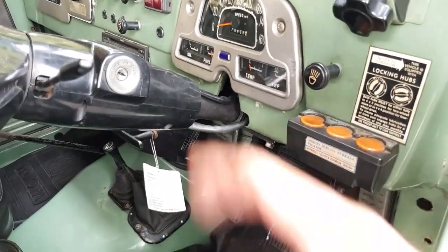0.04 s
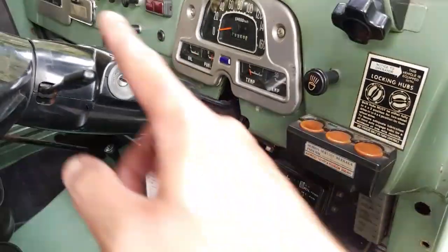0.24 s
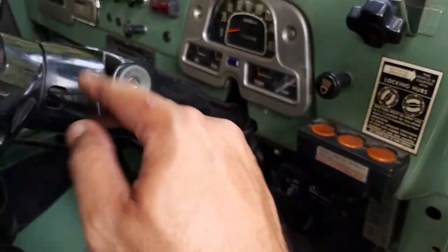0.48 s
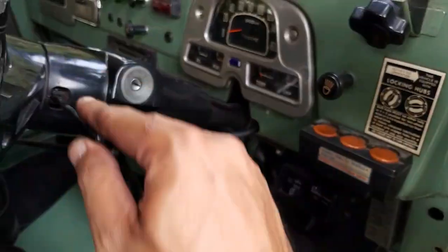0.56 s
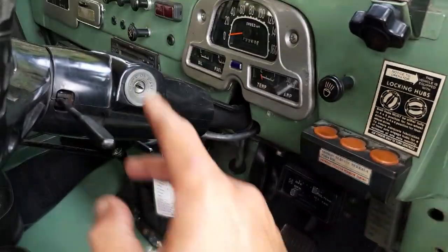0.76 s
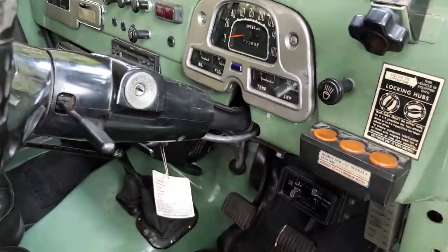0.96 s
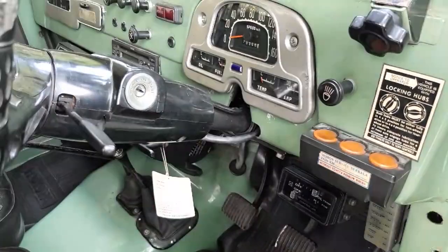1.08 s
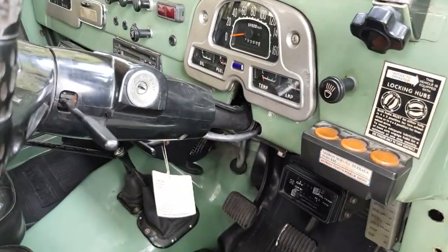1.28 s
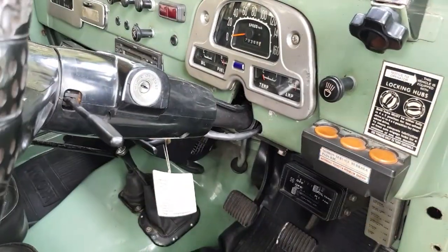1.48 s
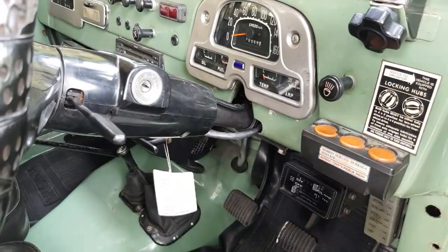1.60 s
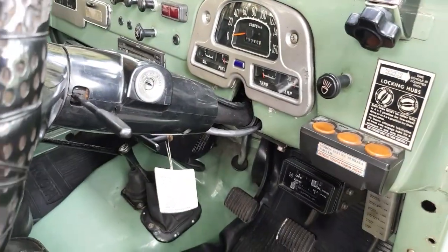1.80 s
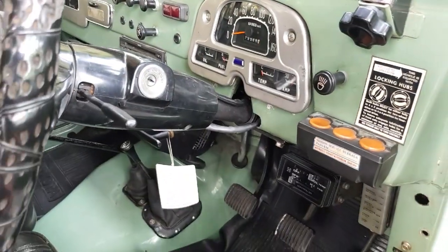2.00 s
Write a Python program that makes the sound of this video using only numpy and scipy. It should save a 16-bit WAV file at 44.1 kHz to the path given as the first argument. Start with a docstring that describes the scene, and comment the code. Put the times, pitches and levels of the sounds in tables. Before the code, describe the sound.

Close stereo microphones catch light plastic ticks, a hard turn signal lever snap ringing the steering column, thin squeaks and rasps, then a single bright flasher click, with a quiet low engine rumble throughout.

```python
"""Inside a cab with the engine idling low, a hand touches the turn signal stalk and snaps it over its detent.
Bursts of noise and fading tones make the stalk's contacts, the ringing steering column and the relay's clicks.
Fluttering noise makes the rubbing hand and the faint sizzle of the switch, which also rings a springy part.
Thin squeaks, made of gliding tones, rise and give way to noisy rasps. A thud and a boom follow the snap.
Steady wavering tones over soft noise make the engine."""
import sys
import numpy as np
from scipy import signal
from scipy.fft import rfft, irfft, next_fast_len
from scipy.io import wavfile
from scipy.ndimage import map_coordinates

SR = 44100
rng = np.random.default_rng(int(sys.argv[2]) if len(sys.argv) > 2 else 0)


def transcribe(u):
    """Save the signal u as a 16-bit wav file named by the first command-line argument.

    u: samples, shape (n,) or (channels, n), limited to [-1, 1]; the rate is SR.
    q: integer samples, one column per channel.
    """
    v = np.clip(np.atleast_2d(u).T, -1, 1)
    q = np.round(v * 32767).astype(np.int16)
    wavfile.write(sys.argv[1], SR, q)


N = 90404

# The stalk snaps home, then rattles more weakly. Each row: start in seconds, level in dB, hold in seconds.
SNAPS = [(0.5881, -21, 0.0059), (0.604, -34.5, 0.003), (0.622, -42, 0.0021)]
SNAP_ATTACK_S = .00033


def amp(db):
    """Turn decibels into a gain."""
    return 10 ** (np.asarray(db) / 20)


def unit(x):
    """Scale a signal to an average strength (rms) of 1."""
    return x / np.sqrt(np.mean(x ** 2) + 1e-20)


def clock():
    """Give the time of each sample in seconds."""
    return np.arange(N) / SR


def along(points, hz):
    """Read a curve of (Hz, value) points, with pitch on a logarithmic axis."""
    point_hz, values = np.transpose(points)
    return np.interp(np.log(hz + 1), np.log(point_hz + 1), values)


def level(rows):
    """Turn (seconds, dB) points into a gain for each sample."""
    return amp(np.interp(clock(), *np.transpose(rows)))


def wobble(rate):
    """Draw a smooth random curve through `rate` random points a second."""
    points = rng.standard_normal(int(N * rate / SR) + 4)
    return map_coordinates(points, [clock() * rate])


def filtered(x, response):
    """Change the strength and timing of each frequency in x."""
    padded = next_fast_len(N + SR // 2)
    spectrum = rfft(x, padded)
    return irfft(spectrum * response(np.fft.rfftfreq(padded, 1 / SR)), padded)[..., :N]


def noise(colour, tilt=0):
    """Noise of rms 1 with a colour and a tilt in dB per octave; it fades below the colour's first point."""
    low = colour[0][0]

    def response(f):
        octaves = np.log2(np.maximum(f, low) / low)
        return amp(along(colour, f) + tilt * octaves) * np.minimum(f / low, 1) ** 2

    return unit(filtered(rng.standard_normal(N), response))


def envelope(s, hold, t60, attack):
    """Rise quickly, hold, then die away by 60 dB in t60 seconds."""
    t = np.maximum(clock() - s, 0)
    release = amp(-60 * np.maximum(t - hold, 0) / t60)
    return (1 - np.exp(-t / attack)) * release


def swell(s, rise, fall):
    """A smooth hump that peaks at s."""
    t = clock() - s
    return np.exp(-(t / np.where(t < 0, rise, fall)) ** 2)


def ring(modes, s, blur=0.55, attack=0.00064):
    """A struck object sounds as fading tones, here with slightly unsteady phase."""
    out = np.zeros(N)
    for hz, db, t60 in modes:
        phase = 2 * np.pi * (hz * clock() + rng.random()) + blur * wobble(150)
        out += amp(db) * envelope(s, 0, t60, attack) * np.sin(phase)
    size = np.linalg.norm([amp(db) for _, db, _ in modes]) / np.sqrt(2)
    return out / size


def struck(modes, drive):
    """A chattering force keeps tones ringing; the result has the same rms as the force."""
    out = signal.fftconvolve(drive, ring(modes, 0, blur=0.16))[:N]
    return unit(out) * np.sqrt(np.mean(drive ** 2))


def panned(db):
    """Left and right gains of equal total power for a level difference in dB."""
    gains = np.array([amp(db / 2), amp(-db / 2)]).reshape(2, -1)
    return gains / np.sqrt(np.mean(gains ** 2, axis=0))


def place(x, lag_ms, pan, cab_db):
    """Direct sound reaches two microphones (left later by lag_ms), followed by the cab's short tail."""
    # How the tail fades. Each row: frequency in Hz, time to fall by 60 dB in seconds.
    cab = [(200, 0.33), (1500, 0.28), (6000, 0.16), (12000, 0.19)]
    sides = np.array([[1], [-1]])
    direct = filtered(x, lambda f: np.exp(-1j * np.pi * f * sides * lag_ms / 10 ** 3))
    # The tail is noise that fades at a different speed for each frequency.
    hz, t, z = signal.stft(rng.standard_normal((2, SR // 3)), SR, nperseg=256)
    fading = z * amp(-60 * t / along(cab, hz)[:, None])
    tail = signal.istft(fading, SR, nperseg=256)[1]
    wet = signal.fftconvolve(x[None], tail / np.linalg.norm(tail[0]), axes=1)[:, :N]
    return filtered(direct + amp(cab_db) * wet, lambda f: panned(along(pan, f)))


def detent(grain_db=3):
    """The stalk snaps home with a rattling crack; the dash panel swells after it."""
    # Colour of the crack. Each row: frequency in Hz, level in dB.
    crack_colour = [(280, -35), (470, -23), (640, -9.5), (830, -12.5), (1100, -38), (1500, -10),
                    (2100, -21), (2450, -8.5), (3700, -8.5), (4800, -1), (5700, -9), (6400, -4),
                    (7700, -10.5), (9000, -3), (13000, -16)]
    # Tones of the dash panel. Each row: frequency in Hz, relative level in dB, time to fall by 60 dB in seconds.
    panel = [(120, 8, 0.092), (174.8, 3.5, 0.097), (257.5, 5.5, 0.13), (347.5, -14.5, 0.2), (477, 5, 0.15)]
    panel_db, panel_attack_s, panel_delay_s = -25.5, .025, .0147
    force = sum(amp(db) * envelope(s, hold, .026, SNAP_ATTACK_S) for s, db, hold in SNAPS)
    crack = force * unit(noise(crack_colour) * amp(grain_db * wobble(700)))
    return crack + amp(panel_db) * ring(panel, SNAPS[0][0] + panel_delay_s, attack=panel_attack_s)


def column():
    """The snap rings the steel column; each tone reaches the two microphones in its own way."""
    # Tones of the column. Each row: frequency in Hz, relative level in dB, time to fall by 60 dB in seconds,
    # left minus right in dB, polarity (-1 = the microphones hear opposite swings).
    column_modes = [(419, -4, .17, 1, -1), (470, -7, .2, 0, 1), (560, -9, .14, 5, 1), (642, 1, .13, -1, 1),
                    (1038, -21, .17, 0, 1), (1169, -13, .14, 1, -1), (1307, -15, .15, 0, 1),
                    (1516, -5, .125, -1, 1), (1596, -12, .15, -1, 1), (1733, -12, .15, 0, 1),
                    (1813, -11, .14, 0, -1), (2440, -11, .08, 0, 1), (2615, -15, .11, 0, 1),
                    (2911, -10, .13, 0, 1), (3072, -8, .12, 0, -1), (3197, -8, .12, -15, 1),
                    (3546, -9, .11, 0, 1), (3918, -6, .12, -4, -1), (4673, -7, .12, 3, -1),
                    (4823, -5, .14, -4, 1), (6274, -2, .12, 18, 1), (6424, -7, .11, 2, 1),
                    (7261, -7, .11, -5, -1), (8303, -6, .11, -1, 1), (8624, -4, .13, 14, 1),
                    (8990, -7, .11, -15, -1), (9137, -6, .1, -7, 1)]
    column_db, attack_s = -18, .0035
    out = np.zeros((2, N))
    for hz, db, t60, pan_db, polarity in column_modes:
        mode = ring([(hz, 0, t60)], SNAPS[0][0], blur=.2, attack=attack_s)
        out += amp(db) * mode * panned(pan_db) * [[1], [polarity]]
    size = np.linalg.norm([amp(row[1]) for row in column_modes])
    return amp(column_db) * out / size


def dash_knock():
    """A duller knock sounds from the dash just after the snap."""
    # Colour of the knock. Each row: frequency in Hz, level in dB.
    knock_colour = [(200, -6.5), (520, 0), (800, -11.5), (1050, -8.5), (1250, -15), (1600, -5.5),
                    (2200, -28), (8000, -57)]
    start_s, knock_db, hold_s, t60_s = .625, -34, .004, .06
    return amp(knock_db) * envelope(start_s, hold_s, t60_s, SNAP_ATTACK_S) * noise(knock_colour)


def flasher(attack_s=0.00014):
    """The relay pulls in with a knock, strikes and bounces, ringing its can."""
    # Relay contacts. Each row: start in seconds, level in dB, hold in seconds, treble tilt in dB per octave.
    contacts = [(1.268, -38.5, .002, -4), (1.2735, -25.5, .0012, 2), (1.2772, -21, .002, -1.4),
                (1.2806, -25.5, .0012, 1), (1.2885, -34, .002, 0)]
    # Colour of the clicks. Each row: frequency in Hz, level in dB.
    click_colour = [(120, -41), (200, -16.5), (768, -13.5), (1230, -12.5), (1440, -12.5), (2110, -19),
                    (2310, -14.5), (3600, -23), (4600, -11), (6240, -9.5), (7970, -11.5), (11000, -6),
                    (12600, 0)]
    # Tones of the can. Each row: frequency in Hz, relative level in dB, time to fall by 60 dB in seconds.
    can_modes = [(1453, -13, .09), (2307, -15, .07), (4398, -12, .09), (5075, -7, .07), (6290, -6, .11),
                 (7154, -8, .06), (7485, -3, .06), (9250, -2, .06), (11430, 1, .07), (12380, 1, .11),
                 (12800, 4, .06)]
    # Tones of the panel that holds the relay, with the same columns in Hz, dB and seconds.
    holder = [(245, 5, 0.079), (327, -3, 0.06), (564, -6, 0.048)]
    click_t60_s, ring_db, knock_db = .007, -11, -39
    can = np.zeros(N)
    for s, db, hold, tilt in contacts:
        click = envelope(s, hold, click_t60_s, attack_s) * noise(click_colour, tilt)
        can += amp(db) * (click + amp(ring_db) * ring(can_modes, s))
    return can + amp(knock_db) * ring(holder, contacts[0][0])


def stalk_ticks(grain_db=5):
    """The loose stalk chatters briefly against its stops."""
    # Light contacts. Each row: start in seconds, level in dB, hold in seconds, treble tilt in dB per octave.
    ticks = [(.1945, -45, .002, -1), (.2255, -29.5, .003, -1), (.231, -25, .002, .6),
             (.236, -31.5, .003, -2), (.243, -41, .004, 0), (.3515, -45, .001, .3), (.4385, -42, .002, .7),
             (.491, -51, .001, 3), (.509, -49, .002, 4), (.5425, -30, .003, -.7), (.549, -32.5, .002, -2.5),
             (.557, -39, .002, -2.5), (.582, -29, .003, -2.5), (.962, -46, .002, 0), (1.214, -42, .002, 2)]
    # Colour of the ticks. Each row: frequency in Hz, level in dB.
    tick_colour = [(240, -46), (400, -17.5), (1160, -21), (1570, -8.5), (3450, -7), (3880, -18.5),
                   (4760, -3), (6650, -22.5), (7150, 3.5), (7810, -11), (13000, -2)]
    # Tones of the stalk. Each row: frequency in Hz, relative level in dB, time to fall by 60 dB in seconds.
    stalk = [(1561, -0.5, 0.039), (1683, -5, 0.042), (2430, -10, 0.04), (3350, -21, .04),
             (4940, -1.5, 0.029), (7243, 0.5, 0.039), (8690, 5, 0.029), (9050, -2.5, 0.025),
             (9400, 1.5, .04), (10600, 0.5, 0.037), (11250, 3, 0.032), (11450, 2, .05), (12660, 3.5, 0.043)]
    t60_s, attack_s, ring_db = .014, .0003, -2.5
    scatter_db = 3.5  # each contact favours other tones
    out = np.zeros(N)
    for s, db, hold, tilt in ticks:
        chatter = envelope(s, hold, t60_s, attack_s) * unit(amp(grain_db * wobble(900)))
        modes = [(hz, mode_db + scatter_db * rng.standard_normal(), t60) for hz, mode_db, t60 in stalk]
        ringing = struck(modes, chatter * rng.standard_normal(N))
        out += amp(db) * (chatter * noise(tick_colour, tilt) + amp(ring_db) * ringing)
    return out


def touches():
    """Fingertips land on the stalk with dull, soft knocks."""
    # Landings. Each row: peak time in seconds, level in dB, rise in seconds, fall in seconds.
    landings = [(0.421, -47.5, 0.022, 0.011), (0.449, -53, 0.0022, 0.0089), (0.494, -55.5, 0.009, 0.022)]
    # Colour of the knocks. Each row: frequency in Hz, level in dB.
    touch_colour = [(300, -17), (620, -3), (1150, -17.5), (1700, -17), (2100, -18.5), (5000, -24.5),
                    (13000, -20.5)]
    return sum(amp(db) * swell(s, rise, fall) for s, db, rise, fall in landings) * noise(touch_colour)


def rubs(grain_db=3):
    """The hand brushes the controls with a grainy hiss."""
    # Soft strokes. Each row: peak time in seconds, level in dB, rise in seconds, fall in seconds,
    # tilt in dB per octave.
    strokes = [(0.214, -55.5, 0.05, 0.011, -7), (.5, -54, 0.035, 0.032, -3.5),
               (1.195, -48.5, 0.028, 0.075, -3.5), (1.229, -38, 0.021, 0.0076, 1),
               (1.785, -64.5, 0.062, 0.033, -5.5)]
    # Colour of the rubbing. Each row: frequency in Hz, level in dB.
    rub_colour = [(240, -20), (400, -15.5), (1820, -29), (2070, -4), (2330, -7), (4110, -10), (5040, -7),
                  (13000, 5)]
    out = np.zeros(N)
    for s, db, rise, fall, tilt in strokes:
        grains = unit(noise(rub_colour, tilt) * amp(grain_db * wobble(500)))
        out += amp(db) * swell(s, rise, fall) * grains
    return out


def sizzle(hiss_db=-1):
    """Tiny slips in the switch keep a springy part ringing."""
    # Strength of the sizzle over time. Each row: time in seconds, level in dB.
    sizzle_level = [(.94, -78), (.968, -47), (1.0, -44), (1.019, -35.5), (1.03, -51), (1.05, -60),
                    (1.063, -39), (1.09, -67), (1.109, -44), (1.125, -62), (1.15, -70), (1.25, -58),
                    (1.4, -100)]
    # Tones of the springy part. Each row: frequency in Hz, relative level in dB, time to fall by 60 dB in seconds.
    spring = [(2647, -11, 0.046), (5000, -27, 0.092), (7330, -4, 0.04), (8580, -10, 0.055),
              (9280, -5, 0.024), (11110, -1.5, 0.031), (12380, -1.5, 0.08), (12900, 6.5, 0.032)]
    # Colour of the hiss. Each row: frequency in Hz, level in dB.
    hiss_colour = [(1000, -16.5), (2700, -15), (3400, -36), (4500, 1.5), (6200, -16), (7200, -4),
                   (8000, -44), (9400, 1.5), (10400, -15), (12400, -12), (13000, 3.5)]
    scatter_db, slips_per_s = 6.5, 350
    slips = unit(amp(scatter_db * wobble(slips_per_s)))
    ringing = struck(spring, slips * rng.standard_normal(N))
    hiss = slips * noise(hiss_colour)
    return level(sizzle_level) * (ringing + amp(hiss_db) * hiss)


def squeaks(flutter_db=4):
    """Thin rising tones with an unsteady pitch and a fluttering level."""
    # Each row: start in seconds, length in seconds, first pitch in Hz, last pitch in Hz, level in dB,
    # octave level in dB relative to the main tone.
    squeak_rows = [(0.689, 0.088, 2816, 3423, -47.5, 7.5), (1.894, 0.088, 2624, 2765, -62, 6),
                   (1.981, 0.065, 2633, 3264, -57, -7.5)]
    jitter = .025  # random pitch change, as a share of the pitch
    halfway_db = -5  # the tone between pitch and octave
    out = np.zeros(N)
    for s, length, first_hz, last_hz, db, octave_db in squeak_rows:
        progress = np.clip((clock() - s) / length, 0, 1)
        pitch = (first_hz + (last_hz - first_hz) * progress) * (1 + jitter * wobble(1200))
        phase = 2 * np.pi * np.cumsum(pitch) / SR
        partials = np.sin(phase) + amp(halfway_db) * np.sin(1.5 * phase)
        partials += amp(octave_db) * np.sin(2 * phase)
        arch = np.sqrt(4 * progress * (1 - progress))
        out += amp(db) * arch * unit(partials * amp(flutter_db * wobble(160)))
    return out


def rasps(grain_db=4):
    """Rough chirrs: noise with a fast flutter."""
    # Each row: peak time in seconds, level in dB, rise in seconds, fall in seconds.
    rasp_rows = [(0.825, -48.5, 0.05, 0.033), (0.997, -46, 0.034, 0.023), (2.045, -60.5, 0.034, .04)]
    # Colour of the rasps. Each row: frequency in Hz, level in dB.
    rasp_colour = [(1500, -23.5), (2800, -11), (3600, -36), (4500, 1.5), (5500, -1), (6500, -11.5),
                   (8500, -20.5), (13000, -16.5)]
    swells = sum(amp(db) * swell(s, rise, fall) for s, db, rise, fall in rasp_rows)
    return swells * unit(noise(rasp_colour) * amp(grain_db * wobble(450)))


def shudder(drift=0.28):
    """A dull thud of noise and a low, slightly drifting boom follow the snap."""
    # Strength of the thud over time. Each row: time in seconds, level in dB.
    thud_level = [(.59, -88), (.628, -37.5), (.67, -41), (.72, -43.5), (.8, -53.5), (.9, -77), (1, -73)]
    # Colour of the thud. Each row: frequency in Hz, level in dB.
    thud_colour = [(42, -12), (60, -11), (84, 11.5), (125, -1.5), (250, -19), (480, -14), (900, -28),
                   (2000, -70)]
    # Strength of the boom over time. Each row: time in seconds, level in dB.
    boom_level = [(.6, -66), (.65, -34), (.72, -40.5), (.78, -48.5), (.85, -35.5), (.91, -44.5), (1, -70)]
    boom_hz = 42.5
    boom = np.sqrt(2) * np.sin(2 * np.pi * boom_hz * clock() + drift * wobble(11.9))
    return level(thud_level) * noise(thud_colour) + level(boom_level) * boom


def engine(waver_db=3.5, drift=1.0):
    """Wavering idle tones over a rumble that thins into hiss."""
    # Engine tones. Each row: frequency in Hz, level in dB.
    idle = [(60, -54), (80, -65.5), (99.5, -56.5), (120.5, -60), (181, -60), (225, -66.5), (251, -69)]
    # Colour of the rumble and hiss. Each row: frequency in Hz, level in dB.
    floor_colour = [(30, -14), (42, 2), (69, -1), (150, -9), (237, -13.5), (309, -17.5), (487, -25),
                    (653, -24.5), (1660, -37.5), (3300, -46), (7000, -40), (10200, -53), (12000, -41.5),
                    (13000, -51)]
    # How alike left and right are. Each row: frequency in Hz, likeness (1 = the same, 0 = unrelated).
    floor_alike = [(50, 0.99), (200, 0.78), (500, 0.28), (2000, 0.043), (9000, 0.046)]
    floor_db = -47
    lines = np.zeros(N)
    for hz, db in idle:
        phase = 2 * np.pi * (hz * clock() + rng.random()) + drift * wobble(7.0)
        lines += np.sqrt(2) * amp(db + waver_db * wobble(8.54)) * np.sin(phase)

    def shares(f):
        # Shares of the common sound and of the sound that differs between the sides.
        turn = np.arccos(np.clip(along(floor_alike, f), -1, 1)) / 2
        return np.array([np.cos(turn), np.sin(turn)])

    mid, side = filtered(np.array([noise(floor_colour), noise(floor_colour)]), shares)
    return lines + amp(floor_db) * np.array([mid + side, mid - side])


def scene():
    """Everything as heard from the driver's seat."""
    # Side balance of each source. Each row: frequency in Hz, left minus right in dB.
    snap_pan = [(1000, 1.5), (6000, 1.5), (12000, 0)]
    relay_pan = [(60, 0), (230, 1.5), (910, 3), (3520, -1), (13700, -2.5)]
    hand_pan = [(60, -1), (180, 5), (530, 4), (1560, 0), (4620, -1), (13700, -1.5)]
    switch_pan = [(60, 2.5), (230, -1), (910, 3), (3520, 0), (13700, -3.5)]
    squeak_pan = [(3000, -2.5), (6000, -2)]
    snap = place(detent() + dash_knock(), lag_ms=0.13, pan=snap_pan, cab_db=-2) + column()
    relay = place(flasher(), lag_ms=-0.303, pan=relay_pan, cab_db=-3.0)
    hand = place(stalk_ticks() + rubs() + touches(), lag_ms=-0.16, pan=hand_pan, cab_db=-2)
    switch = place(sizzle(), lag_ms=-0.224, pan=switch_pan, cab_db=2.5)
    squeaking = place(squeaks() + rasps(), lag_ms=-0.17, pan=squeak_pan, cab_db=2)
    low = (engine() + shudder()) * amp([[.9], [-.9]])  # dB for left and right
    return snap + relay + hand + switch + squeaking + low


def record(dry):
    """The recorder cuts steeply above its band limit."""
    top_hz = 13080
    return filtered(dry, lambda hz: 1 / np.sqrt(1 + (hz / top_hz) ** 200))


dry = scene()
out = record(dry)
transcribe(out)
```